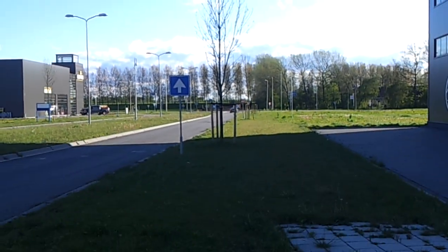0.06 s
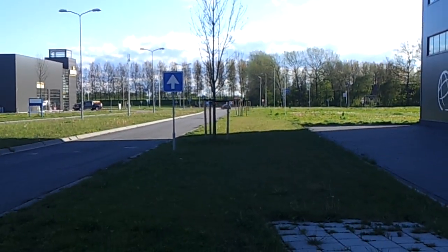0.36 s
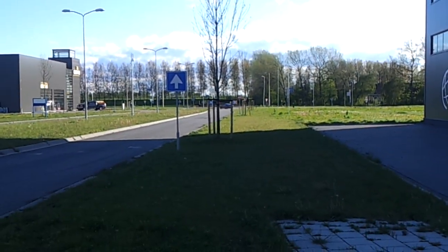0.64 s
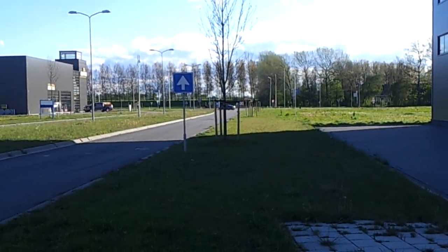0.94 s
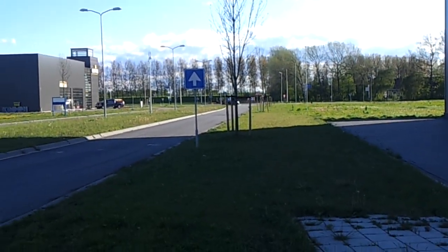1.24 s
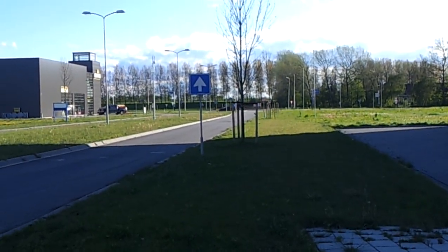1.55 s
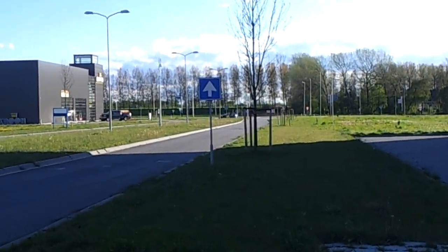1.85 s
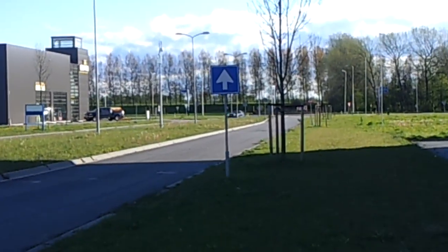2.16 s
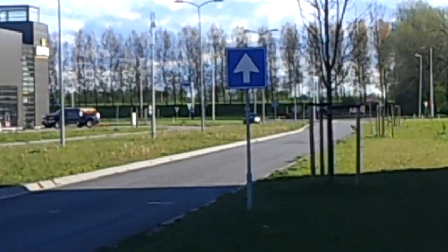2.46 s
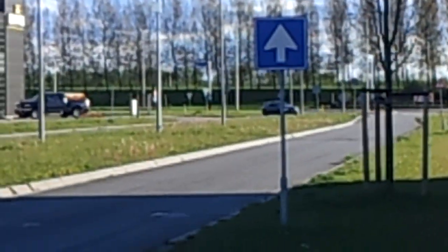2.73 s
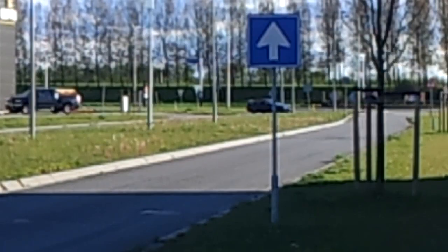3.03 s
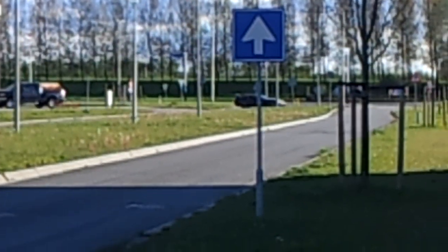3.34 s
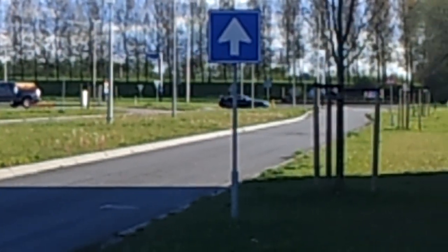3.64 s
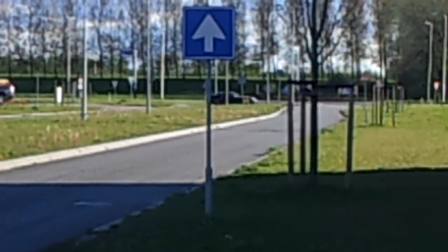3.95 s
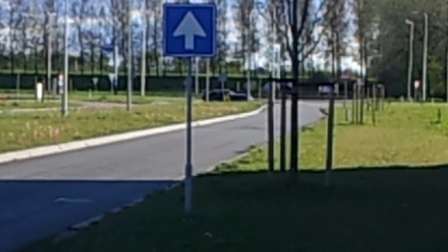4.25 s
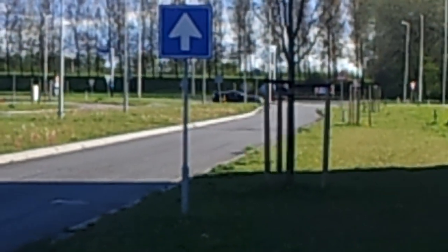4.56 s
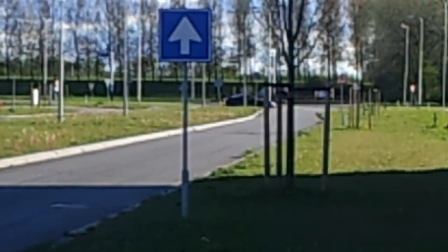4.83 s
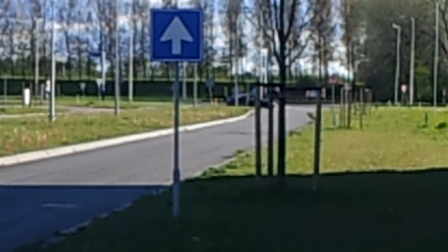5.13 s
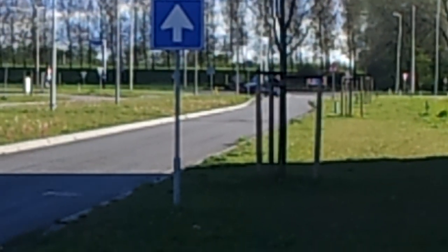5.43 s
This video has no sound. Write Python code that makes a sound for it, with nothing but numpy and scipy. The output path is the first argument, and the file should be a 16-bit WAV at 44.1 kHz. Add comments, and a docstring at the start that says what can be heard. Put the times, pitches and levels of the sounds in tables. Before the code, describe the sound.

A car some distance away gives a short rising rev and slides through a bend, its tyres squealing unevenly and rasping on asphalt for about three seconds, echoing lightly in the open air. Up close, the hand-held microphone picks up light ticks and a thin squeak early on, and wind rumble throughout. As the skid dies, the wind turns into heavy, dull thumps from either side, over faint bird chirps and far traffic.

```python
"""Outdoors, some way from a bend in a road: a car revs and slides through it. Two tyres stick and slip
in wavering squeals over the scrub of rubber on asphalt, smeared by echoes off buildings and trees.
Up close, gusts buffet each microphone port of a hand-held camera separately, and the camera ticks and
squeaks in the hand. A small bird whistles over a bed of far traffic and leaves."""
import sys
import numpy as np
from scipy import signal
from scipy.fft import rfft, irfft, next_fast_len
from scipy.io import wavfile

SR = 44100
rng = np.random.default_rng(int(sys.argv[2]) if len(sys.argv) > 2 else 0)


def materialize(psi):
    """Save the field psi as 16-bit PCM at rate SR to the path in sys.argv[1].

    A 1-D psi becomes a single channel; in a 2-D psi each row is a channel.
    """
    bounded = np.clip(np.atleast_2d(psi).T, -1, 1)
    quanta = np.round(bounded * 32767).astype(np.int16)
    wavfile.write(sys.argv[1], SR, quanta)


N = 246519
T = np.arange(N) / SR

# how hard the car slides: t/s, level/dB re a full slide
SLIDE_DEPTH = [(0, -32.5), (.9, -27.5), (1.05, -18.5), (1.45, -9.5), (2.1, -5.5), (2.85, -0.5), (3.63, -1),
               (3.72, -5), (3.8, -6), (3.95, -14), (4.2, -22), (4.7, -34), (5.59, -52)]


def undb(db):
    """Decibels to gain."""
    return np.exp(np.asarray(db) * (np.log(10) / 20))


def unit(x):
    """Scale to rms 1."""
    return x / np.sqrt(np.mean(x ** 2))


def curves(table):
    """A table's columns as automation: straight lines between its times."""
    times, *columns = np.transpose(table)
    return [np.interp(T, times, column) for column in columns]


def during(table, fade_s=0.019):
    """A soft-edged gate, open while a table lasts."""
    return np.clip(np.minimum(T - table[0][0], table[-1][0] - T) / fade_s, 0, 1)


def shaped(x, gain):
    """Filter with a gain that is a function of frequency."""
    size = next_fast_len(N + 4096)
    f = np.arange(size // 2 + 1) * SR / size + 1e-3
    return irfft(rfft(x, size) * gain(f), size)[..., :N]


def noise(colour, channels=2):
    """Independent noises, rms 1, with an EQ curve of f/Hz, level/dB."""
    hz, db = np.transpose(colour)
    white = rng.standard_normal((channels, N))
    return unit(shaped(white, lambda f: undb(np.interp(np.log(f), np.log(hz), db))))


def walk(hz):
    """Smooth random modulation up to about hz, rms 1."""
    step = 16
    size = next_fast_len(N // step + 2)
    f = np.arange(size // 2 + 1) * SR / step / size
    slow = irfft(rfft(rng.standard_normal(size)) / (1 + (f / hz) ** 4), size)
    return unit(np.interp(np.arange(N) / step, np.arange(size), slow))


def flutter(depth_db, hz):
    """A randomly wavering gain, rms 1."""
    return unit(undb(depth_db * walk(hz)))


def phase_of(hz):
    """Running phase of a moving pitch."""
    return 2 * np.pi * np.cumsum(hz) / SR


def pan(db):
    """Constant-power gains for a pan given as left minus right in dB."""
    gains = undb(np.array([db, -db]) / 2).reshape(2, -1)
    return gains / np.sqrt(np.mean(gains ** 2, axis=0))


def add(out, start, sound):
    """Mix a short sound in, start seconds from the top."""
    i = max(int(start * SR), 0)
    out[:, i:i + sound.shape[-1]] += sound[..., :N - i]


def ambience(level_db=-44.5):
    """Far traffic and leaves blend into a nearly steady bed."""
    # colour of the bed: f/Hz, level/dB
    colour = [(30, 11.5), (150, -25), (400, -16), (700, -6.5), (1100, -6.5), (1800, -9.5), (2400, -11),
              (3200, -17), (4300, -17.5), (5500, -24), (8000, -25.5), (11000, -38.5), (14500, -73)]
    return noise(colour) * undb(level_db + .5 * walk(23))


def microphone_hiss(level_db=-63.3):
    """The microphone's own noise floor."""
    # colour of the hiss: f/Hz, level/dB
    colour = [(3000, -30), (7000, -5), (10000, 0), (14500, -1)]
    return noise(colour) * undb(level_db)


def airflow(swell_db=2, swell_hz=10):
    """Strength of the wind at each port: an unsteady breeze with short gusts on top."""
    # the breeze: t/s, level/dB, pan/dB
    breeze_ride = [(0, -32, 0), (.45, -33, -10.5), (.8, -42.5, 6), (1.1, -43.5, 5), (1.72, -42, 6),
                   (1.9, -32, 0), (2.25, -30, -2), (2.85, -37.5, 0.5), (3.4, -31, 5), (3.7, -22.5, -7),
                   (4.05, -26.5, -5), (4.35, -32, 1.5), (4.6, -26.5, -16), (5.05, -18.5, -17),
                   (5.2, -23, -16), (5.44, -21.5, -19), (5.59, -16.5, -20)]
    # short gusts: middle/s, length/s, level/dB, pan/dB
    gusts = [(0.296, 0.05, -24.5, 15), (1.086, 0.037, -35, 2), (1.31, 0.039, -33.5, -1.5),
             (1.65, 0.06, -35.5, -3), (2.01, 0.069, -22, 13), (2.667, 0.038, -27.5, -11),
             (3.036, 0.082, -24, -21), (3.235, 0.066, -26.5, -16), (3.342, 0.057, -34, 22),
             (3.577, 0.08, -16, 8), (3.808, 0.054, -30.5, 15), (4.003, 0.045, -18.5, -29),
             (4.602, 0.063, -23.5, 21), (4.736, 0.083, -31, 24), (4.965, 0.059, -22, 20)]
    db, pan_db = curves(breeze_ride)
    breeze = undb(db) * pan(pan_db) * np.array([flutter(swell_db, swell_hz) for _ in range(2)])
    gust_power = sum((undb(peak_db) * pan(lean_db) * np.exp(-2 * ((T - middle) / length) ** 2)) ** 2
                     for middle, length, peak_db, lean_db in gusts)
    return np.sqrt(breeze ** 2 + gust_power)


def wind(flow, rumble_growth=0.92, small_db=-10.5, small_growth=0.44, brighten=0.15, calm_db=-31):
    """Each port has its own turbulence; stronger gusts carry smaller, faster eddies."""
    # colour of the turbulence: f/Hz, level/dB
    colour = [(20, -11), (50, 3.5), (140, 4), (230, -3.5), (350, -14), (500, -23), (800, -36.5),
              (1400, -59.5), (3000, -89)]
    gust = flow * np.array([flutter(3, 61) for _ in range(2)])
    eddies = noise(colour)
    small = shaped(eddies, lambda f: 1 / (1 + (230 / f) ** 6))
    rumble, small = unit(eddies - small), unit(small)
    finest = shaped(small, lambda f: 1 / (1 + (520 / f) ** 4))
    strength = flow / undb(calm_db)
    rumble_gain = gust * strength ** (rumble_growth - 1)
    small_gain = gust * undb(small_db) * strength ** small_growth
    finest_lift = (small_gain / undb(calm_db)) ** brighten
    return rumble_gain * rumble + small_gain * (small - finest + finest * finest_lift)


def buffets(flow, width_s=0.00098, churn_db=-8, churn_s=0.0094, trim_db=-1, lesser_db=-8, count=60):
    """An eddy bursts on a port: one swing of pressure, steeper when strong, then a short churn."""
    # the strongest eddies: t/s, level/dB, pan/dB
    big_hits = [(0.453, -18, -29), (3.507, -7, -37), (3.518, -19, 17), (3.546, -8, -5), (3.701, -4, 14),
                (4.073, -13, -4), (4.218, -22.5, 20), (4.584, -8, 38), (4.737, -31, 18), (4.834, -18, -25),
                (4.886, -19, -28), (4.954, -5.5, 33), (4.962, -1, 43.5), (4.996, -7, 29), (5.054, -7, -36),
                (5.071, -6.5, -36), (5.095, -8.5, -38), (5.139, -15.5, -31), (5.189, -13.5, -34),
                (5.277, -21, -25), (5.312, -13.5, -38), (5.361, -16, -33), (5.412, -21, -26),
                (5.485, -10.5, -27)]
    out, t = np.zeros((2, N)), np.arange(4096) / SR
    churn = noise([(60, -11), (300, 6), (700, -4.5), (1300, -17), (3000, -65), (8000, -69)], 1)[0]
    u = (t - .002) / width_s
    lesser_hits = []  # at random times, following the wind's strength and side
    for when, luck in rng.random((count, 2)):
        left_db, right_db = 20 * np.log10(flow[:, int(when * N)])
        db = max(left_db, right_db) + lesser_db + 3 * (2 * luck - 1)
        lesser_hits.append((when * N / SR, db, 2 * (left_db - right_db)))
    for k, (start, db, pan_db) in enumerate(big_hits + lesser_hits):
        steepness = 1.02 + 6 * undb(2 * db)
        swing = -np.tanh(u * steepness) * np.exp(-u ** 2)
        tail = churn[k * len(t) // 2:][:len(t)] * np.exp(-t / churn_s) * (1 - np.exp(-t / 0.0025))
        thump = swing / swing.max() + undb(churn_db) * tail
        add(out, start, undb(db + trim_db) * pan(pan_db) * thump)
    return out


def handling(knock_s=0.0017, tick_s=0.001, knock_db=5, tick_db=-1):
    """Dull knocks and sharp ticks: short bursts through the camera body."""
    # small knocks: t/s, level/dB, ring f/Hz, pan/dB
    knocks = [(0.181, -31, 1580, 0), (0.6877, -29.5, 2250, -4), (0.7267, -30.5, 2270, -8),
              (0.84, -38, 2160, 2)]
    # ticks on the body: t/s, level/dB, pan/dB
    ticks = [(.063, -38, -7), (1.318, -27, -10), (1.538, -32, -4)]
    out, t = np.zeros((2, N)), np.arange(2048) / SR
    blows = [(s, db + knock_db, side, 0.81 * hz, 1.1 * hz, knock_s) for s, db, hz, side in knocks]
    blows += [(s, db + tick_db, side, 4500, 15000, tick_s) for s, db, side in ticks]
    for start, db, pan_db, low_hz, high_hz, decay_s in blows:
        band = signal.butter(2, [low_hz, high_hz], "band", fs=SR, output="sos")
        ring = signal.sosfilt(band, rng.standard_normal((2, len(t))) * np.exp(-t / decay_s))
        add(out, start, ring / np.abs(ring).max() * undb(db) * pan(pan_db))
    return out


def rustles(grain_db=2):
    """Brief grainy rubs that swell and fade."""
    # soft rubs: t/s, length/s, centre f/Hz, width/Hz, level/dB
    rubs = [(0.14, 0.44, 4200, 3700, -51), (0.927, 0.21, 1800, 330, -38), (0.872, 0.35, 3900, 3600, -46.5)]
    out = 0
    for start, length, hz, width, db in rubs:
        white = rng.standard_normal((2, N))
        rub = unit(shaped(white, lambda f: 1 / (1 + (2 * (f - hz) / width) ** 2)))
        out = out + rub * undb(db) * np.sin(np.pi * np.clip((T - start) / length, 0, 1))
    return out * undb(grain_db * walk(90))


def scrub(level_db=-26, treble_db=9, treble_slope=0.15, growth=0.85, surge_share=0.061):
    """Rubber tears over grit; harder sliding is louder and brighter, and surges move the treble most."""
    # colour of rubber on asphalt: f/Hz, level/dB
    colour = [(300, -19), (800, -15.5), (1050, 4.5), (1500, 7), (1850, 0.5), (2300, 6), (2900, -3),
              (3300, 1), (4100, -12.5), (4700, -14.5), (5700, -22.5), (7000, -30), (9000, -38),
              (11000, -85)]
    slide_db = curves(SLIDE_DEPTH)[0]
    _, grit_db = surges()
    rasp = noise(colour, channels=1)[0] * flutter(1.4, 39)
    treble = shaped(rasp, lambda f: 1 / (1 + (4500 / f) ** 8))
    body = (rasp - treble) * undb(surge_share * grit_db)
    grit = treble * undb(treble_db + treble_slope * slide_db + grit_db)
    return (body + grit) * undb(level_db + growth * slide_db)


def whine(jitter=0.0392, trim_db=2.5):
    """One thin, rough tone from a tyre at the edge of its grip."""
    # the tone: t/s, f/Hz, level/dB
    ride = [(0, 2320, -62), (.95, 2273, -51), (1.05, 2410, -43), (1.09, 2410, -33), (1.21, 2333, -52),
            (1.28, 2284, -37.5), (1.53, 2266, -36), (1.7, 2299, -43), (1.95, 2276, -53)]
    hz, db = curves(ride)
    phase = phase_of(hz * (1 + jitter * walk(255)))
    return np.sin(phase) * flutter(3, 110) * undb(db + trim_db) * during(ride)


def engine(jitter=0.014, flutter_db=2, rasp_db=-12.5, trim_db=-0.5):
    """The exhaust note climbs until the tyres let go; gas rasps with every firing."""
    # the rev: t/s, firing f/Hz, level/dB
    rev = [(.75, 160.3, -50.5), (.95, 167.9, -39.5), (1.1, 180.3, -37.5), (1.27, 198.3, -34.5),
           (1.38, 213.3, -35), (1.5, 205, -43), (1.63, 190.5, -40), (1.78, 191, -41.5), (1.88, 194.6, -44),
           (2.0, 194, -49)]
    # exhaust partials: multiple of the firing rate, level/dB
    orders = [(1, -0.5), (1.5, -13), (2, -13.5), (2.5, -26), (3, -17.5)]
    hz, db = curves(rev)
    phase = phase_of(hz * (1 + jitter * walk(72)))
    note = sum(undb(order_db) * np.sin(order * phase) for order, order_db in orders)
    note *= undb(flutter_db * walk(25))
    gas = noise([(120, -8), (300, -3), (580, 2), (800, -19), (2000, -46)], channels=1)[0]
    rasp = undb(rasp_db) * gas * (1 + np.sin(phase))
    return (note + rasp) * undb(db + trim_db) * during(rev)


def squeal_envelopes(name, sag_db_per_s=3, harsh_from_db=-8, harsh_slope=1.15):
    """Gains of a tyre's fundamental, octave and top: squeals rise, sag and die; hard slides are harsh."""
    # squeals: tyre, start/s, attack/s, end of hold/s, release/s, level/dB, relative octave/dB, top/dB
    squeals = [("low", 1, 0.31, 4.5, .095, -43, 0.88, -4), ("low", 1.366, 0.13, 2.0, 0.068, -34, -4.5, -2),
               ("low", 1.91, 0.11, 2.85, 0.06, -38, -2, 4.4),
               ("high", 1.52, 0.016, 1.66, 0.029, -23.5, -13.5, -20.5),
               ("high", 1.63, 0.034, 1.82, 0.043, -24.5, -7, -6.5),
               ("high", 1.817, 0.034, 1.955, 0.06, -24.5, -9.5, -6.5),
               ("high", 1.97, 0.02, 2.85, 0.042, -29, -1.5, -0.98),
               ("high", 2.855, 0.066, 3.68, 0.065, -31.5, 0, 0.27),
               ("low", 2.84, 0.037, 3.04, .06, -37, 3.63, 2.9),
               ("low", 3.02, 0.058, 3.525, 0.14, -29, -2.5, -3),
               ("high", 3.735, 0.042, 3.8, 0.035, -31, -1.8, 0),
               ("low", 3.4, 0.026, 3.87, .03, -36.5, 2.3, -8),
               ("low", 3.96, 0.02, 4.0, .02, -33.5, -2, -13),
               ("low", 3.855, 0.022, 3.915, 0.015, -27, -12, -19),
               ("high", 3.87, 0.03, 3.95, 0.041, -40, 2.2, 5.2),
               ("low", 4.05, 0.018, 4.14, 0.021, -35.5, -3, -16)]
    harsh = undb(harsh_slope * np.maximum(curves(SLIDE_DEPTH)[0] - harsh_from_db, 0))
    power = 0
    for which, start, attack, end, release, db, octave_db, top_db in squeals:
        if which == name:
            age = np.maximum(T - start, 0)
            fade = np.exp(-np.maximum(T - end, 0) / release)
            gain = np.minimum(age / attack, 1) * undb(db - sag_db_per_s * age) * fade
            power = power + np.outer(undb([0, octave_db, top_db]), gain) ** 2
    root, octave, top = np.sqrt(power)
    return root, octave * harsh, top * harsh


def tyre(name, pitch, overtones, jitter, wander, spread, sharp, flutter_db, edge_db, trim_db,
         lead_db, ribs_db, lead_top_db, loosen=.45, tilt=0.095, drift=.012, count=3):
    """One tread rib leads with a clear, wavering note; its neighbours stick and slip a little sharp."""
    hz, slide_db = curves(pitch)[0], curves(SLIDE_DEPTH)[0]
    root_gain, octave_gain, top_gain = squeal_envelopes(name)
    screech_db, _ = surges()
    top_gain = top_gain * undb(screech_db)
    slip = undb(loosen * slide_db)  # harder sliding pulls the ribs apart
    # the top overtones need a hard slide
    weights = [(multiple, undb(db + tilt * k * slide_db) * (top_gain if k else octave_gain))
               for k, (multiple, db) in enumerate(overtones)]
    harmonics = lambda phase: sum(weight * np.sin(multiple * phase) for multiple, weight in weights)
    ribs = np.linspace(-1, 1, count)
    roots, upper = 0, 0
    for rib, share in zip(ribs, unit(undb(edge_db * ribs ** 2))):
        detune = slip * (spread * rib + jitter * walk(172.4))
        waver = wander * walk(20) + slip * drift * walk(7)
        phase = phase_of(hz * (1 + sharp + detune + waver))
        chirps = share * flutter(3, 12)  # the ribs take turns
        roots = roots + chirps * np.sin(phase) * flutter(flutter_db, 130)
        upper = upper + harmonics(phase) * flutter(flutter_db, 98)
    neighbours = undb(ribs_db) * root_gain * roots + upper
    phase = phase_of(hz * (1 + .011 * walk(150) + .006 * walk(14)))
    lead = undb(lead_db) * root_gain * np.sin(phase) + undb(lead_top_db) * harmonics(phase)
    lead *= flutter(3.1, 30)
    return (np.sqrt(2) * lead + np.sqrt(2 / count) * neighbours) * undb(trim_db)


def low_tyre():
    """The lower squeal sags in the bend and glides up at each new bite."""
    # stick-slip rate: t/s, f/Hz
    pitch = [(1.101, 1162), (1.35, 1116), (1.471, 1075), (1.65, 1083), (1.78, 1030), (1.96, 1072),
             (2.15, 1006), (2.419, 989.4), (2.7, 1042), (2.88, 1074), (2.982, 1012), (3.08, 1046),
             (3.33, 1110), (3.55, 1096), (3.7, 1065), (3.78, 1117), (3.88, 1064), (4.1, 1180)]
    # squeal overtones: multiple, level/dB
    overtones = [(2, -6.5), (3, -12), (4, -16.5), (5, -21)]
    return tyre("low", pitch, overtones, jitter=.0286, wander=.016, spread=.032, sharp=.014,
                flutter_db=5, edge_db=-6, trim_db=1.2, lead_db=-6, ribs_db=-3, lead_top_db=-11)


def squeak(hz=6950, waver=0.017, shake_db=4, pan_db=4):
    """The camera gives a thin, wavering squeak in the hand."""
    # its envelope: t/s, level/dB
    ride = [(1.375, -62), (1.395, -37), (1.48, -43.5), (1.525, -47.5), (1.55, -54)]
    phase = phase_of(hz * (1 + waver * walk(153)))
    gain = undb(curves(ride)[0] + shake_db * walk(139.3)) * during(ride, fade_s=0.013)
    return pan(pan_db) * np.sin(phase) * gain


def high_tyre():
    """The higher squeal breaks in sharply, dips in mid-bend and climbs again."""
    # stick-slip rate: t/s, f/Hz
    pitch = [(1.55, 1395), (1.701, 1377), (1.8, 1330), (1.9, 1338), (1.98, 1238), (2.07, 1283), (2.2, 1205),
             (2.38, 1208), (2.45, 1178), (2.529, 1209), (2.75, 1230), (2.921, 1311), (3.07, 1293),
             (3.16, 1329), (3.27, 1295), (3.55, 1324), (3.8, 1349)]
    # squeal overtones: multiple, level/dB
    overtones = [(2, -0.5), (3, -7), (4, -20.5), (5, -31)]
    return tyre("high", pitch, overtones, jitter=.027, wander=.015, spread=.046, sharp=.03,
                flutter_db=3.5, edge_db=0, trim_db=-0.8, lead_db=-4, ribs_db=-2, lead_top_db=-14)


def surges():
    """Lift in dB of the screech and of the grit as the tread bites."""
    # bites: middle/s, half length/s, screech lift/dB, grit lift/dB
    bites = [(2.097, 0.14, 2, 2.5), (2.293, 0.22, 2, 6), (2.641, 0.12, 0.5, 9), (2.96, 0.11, 1.5, 6),
             (3.322, 0.052, 4, 1.5), (3.51, 0.077, 4, -13), (3.633, 0.035, 7, 2.5), (3.765, .05, 6.5, 3)]
    return sum(np.outer([screech_db, grit_db], np.exp(-((T - middle) / half) ** 2))
               for middle, half, screech_db, grit_db in bites)


def bird(quaver=0.015):
    """Thin whistles that glide and settle on their end pitch."""
    # notes: t/s, length/s, start f/Hz, end f/Hz, level/dB
    notes = [(4.48, 0.024, 4210, 4400, -54), (4.508, 0.024, 3730, 3980, -46.5),
             (4.509, 0.17, 3320, 2930, -50), (5.003, 0.021, 4180, 4040, -49.5),
             (5.333, 0.024, 5760, 5550, -55)]
    out, shake = np.zeros((1, N)), 1 + quaver * walk(200)
    for start, length, start_hz, end_hz, db in notes:
        u = np.linspace(0, 1, int(length * SR))
        hz = (end_hz + (start_hz - end_hz) * np.exp(-4 * u)) * shake[:len(u)]
        arch = np.sqrt(np.abs(np.sin(np.pi * u)))
        add(out, start, undb(db) * arch * np.sin(phase_of(hz)))
    return out[0]


def outdoors(x, echo_db, t60=0.96, shade_db=4, shift_hz=1.5, damp_hz=3200, damp_s=0.091):
    """The direct sound reaches the left port first; ground, walls and trees scatter the rest."""
    # the left port's lead over the right: f/Hz, phase/rad
    port_lead = [(200, 0.1), (1120, 0.87), (1380, 2.23), (1750, 1.42), (2400, 8.3), (2850, 7.26),
                 (3600, 11.02), (4500, 11.78), (5400, 23.5), (8400, 23)]
    hz, lead = np.transpose(port_lead)
    direct = shaped(x, lambda f: np.array([np.ones_like(f), np.exp(-1j * np.interp(f, hz, lead))]))
    t = np.arange(SR) / SR
    scatter = rng.standard_normal((4, SR)) * np.exp(-np.log(1000) * t / t60) * (1 - np.exp(-t / 0.005))
    treble = signal.sosfilt(signal.butter(2, damp_hz, "high", fs=SR, output="sos"), scatter)
    body = signal.sosfilt(signal.butter(2, damp_hz, fs=SR, output="sos"), scatter[::-1])
    tails = body + treble * np.exp(-t / damp_s)  # treble echoes die sooner
    tails /= np.sqrt(np.sum(tails ** 2, axis=1, keepdims=True))
    echoes = signal.fftconvolve(x[None], tails, axes=1)[:, :N]
    turn = 2 * np.pi * shift_hz * T  # the echo paths shift as the car moves
    heard = direct + undb(echo_db) * (np.cos(turn) * echoes[:2] + np.sin(turn) * echoes[2:])
    # the camera body shades the right port in the treble
    return shaped(heard, lambda f: pan(np.interp(f, [1300, 2400, 4600], [0, -2, shade_db])))


def scene():
    """The car far off with its echoes, the bed and the bird, and dry wind and handling up close."""
    squeal = high_tyre() + low_tyre()
    bed = ambience()
    flow = airflow()
    near = wind(flow) + buffets(flow) + handling() + squeak() + rustles()
    car = outdoors(squeal + whine() + scrub(), echo_db=-6) + outdoors(engine(), echo_db=-9.5)
    return car + bird() + bed + near + microphone_hiss()


def record(dry):
    """The camera clips at full scale and cuts the top."""
    top_cut = signal.ellip(10, .2, 80, 14700, fs=SR, output="sos")
    return signal.sosfilt(top_cut, np.clip(dry, -1, 1))


dry = scene()
out = record(dry)
materialize(out)
```